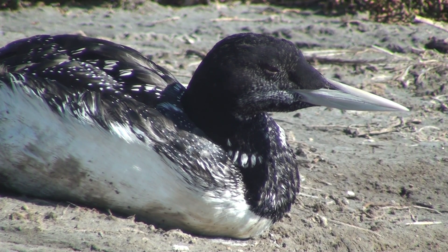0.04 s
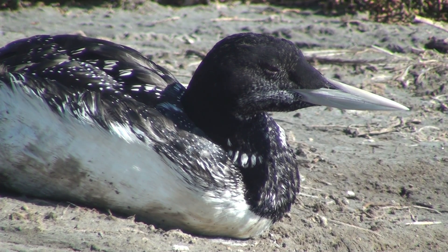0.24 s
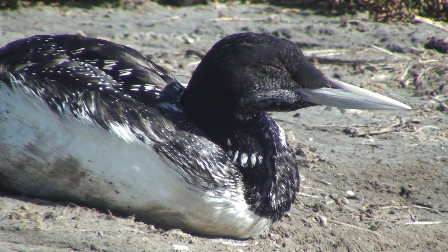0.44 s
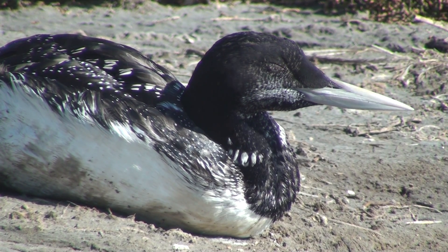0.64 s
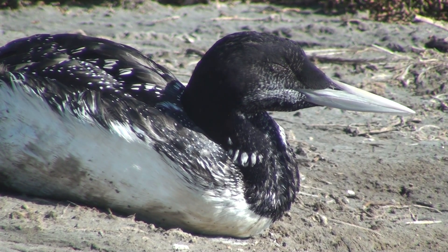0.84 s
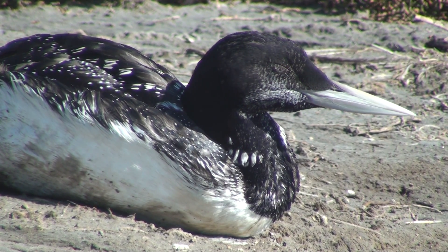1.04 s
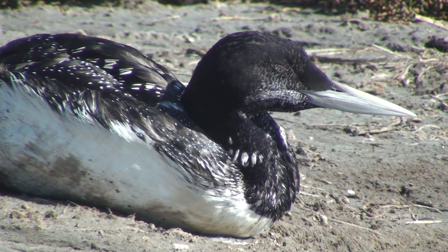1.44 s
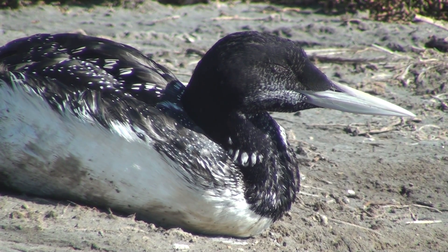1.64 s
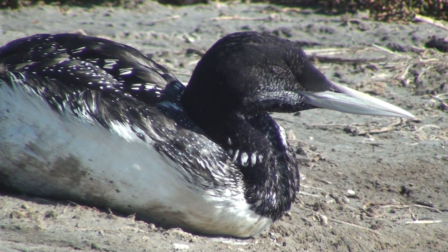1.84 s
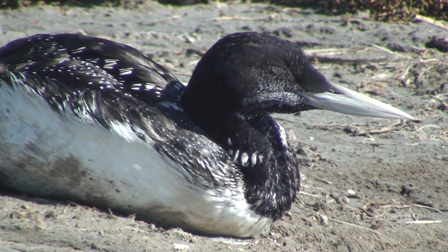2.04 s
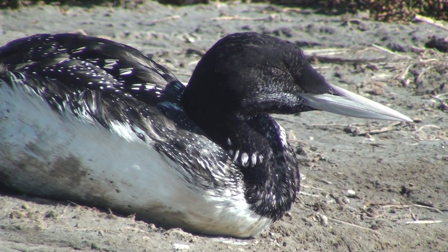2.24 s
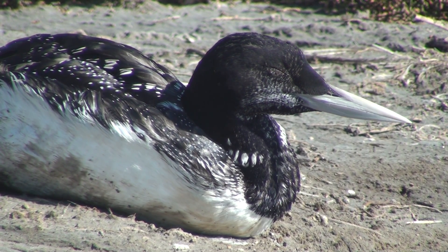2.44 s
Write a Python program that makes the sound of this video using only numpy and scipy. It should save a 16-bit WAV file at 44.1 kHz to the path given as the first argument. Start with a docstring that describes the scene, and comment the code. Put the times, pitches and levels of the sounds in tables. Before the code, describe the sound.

A brief gust of wind buffets the microphone over open ground, thumping and crackling. Weaker puffs follow over a steady outdoor rumble, while faint, uneven rustling close on the left finishes with light ticks.

```python
"""On open sand, beside a resting bird, wind blows across a camera's two microphone openings.
A flurry of eddies (small swirls of air) hits them with thumps, pops and sputter,
then weaker eddies stir the low outdoor rumble. A soft rustle comes and goes close on the left
and ends in tiny ticks. Far off are a faint hum and one short peep."""
import sys
import numpy as np
from scipy import signal
from scipy.fft import rfft, irfft
from scipy.io import wavfile

SR = 44100
rng = np.random.default_rng(int(sys.argv[2]) if len(sys.argv) > 2 else 0)


def dump_mix(stems):
    """Bounce the given channels to the path in sys.argv[1] as a 16-bit WAV at rate SR."""
    frames = np.atleast_2d(stems).T  # one column per channel
    limited = np.clip(frames, -1, 1)  # hard clip at full scale
    pcm = np.round(limited * 32767).astype(np.int16)
    wavfile.write(sys.argv[1], SR, pcm)


N = 114660
TIME, FREQS = np.arange(N) / SR, np.fft.rfftfreq(N, 1 / SR)

# How alike the wind is on both sides. Each row: frequency in Hz, likeness (1 same, 0 unrelated).
WIND_LIKENESS = [(40, 0.9), (80, 0.72), (150, 0.4), (380, -0.14), (2400, -0.52)]
# The swirls of air. Each row: peak time, rise and fall in seconds, level in dB,
# frequency in Hz above which it dulls, how much louder the left is in dB.
EDDIES = [(.045, 0.072, .04, -41, 71, -0.5), (0.231, 0.012, .008, -33, 67, 9.5),
          (.29, 0.033, .03, -44.5, 118, 5), (.343, 0.015, 0.016, -26.5, 139, 2.5),
          (0.367, 0.0086, 0.017, -33, 133, 0), (.43, 0.062, 0.043, -35, 195, -2.5),
          (.48, 0.0061, 0.019, -25, 161, -3.5), (.515, 0.013, 0.076, -39, 209, -1.5),
          (0.593, 0.012, 0.018, -31, 204, -2.5), (.613, 0.0064, 0.0093, -27.5, 160, -3),
          (0.654, 0.075, 0.021, -36, 126, -2.5), (0.736, 0.0084, 0.013, -34.5, 113, 6),
          (.752, 0.0048, 0.0038, -37.5, 130, -2), (0.881, 0.013, 0.029, -43, 98, 0),
          (1.309, 0.023, 0.0083, -39.5, 70.5, 0), (1.372, 0.015, 0.04, -53, 108, -22),
          (1.561, 0.03, 0.023, -38.5, 107, -3.5), (1.623, 0.02, 0.0096, -37.5, 53.3, 6.5),
          (1.66, 0.015, 0.016, -42, 142, -4), (2.25, 0.05, 0.058, -43.5, 87, -3)]
def eddy(peak, rise, fall, level_db, dull_hz, left_db):
    """One swirl passes the openings, and its churning pressure makes a swell of deep noise."""
    bass_cut_hz, treble_cut_hz, churn_db = 37, 1920, 1.5
    tone = FREQS ** 2 / (FREQS ** 2 + bass_cut_hz ** 2)
    tone /= np.hypot(1, (FREQS / dull_hz) ** 2.3)
    tone /= np.hypot(1, (FREQS / treble_cut_hz) ** 2)
    lag = TIME - peak
    swell = np.exp(-(lag / np.where(lag < 0, rise, fall)) ** 2 / 2)
    swirl = noise_pair(tone, WIND_LIKENESS) * swell * gain(churn_db * wobble(rate_hz=98))
    sides = gain(level_db + np.array([[left_db], [-left_db]]) / 2)
    return unit_level(swirl) * np.sqrt(np.mean(swell ** 2)) * sides


# Sudden jolts of air. Each row: time in seconds, left and right peak pressure
# (1 is full scale, minus is a pull), width in seconds.
POPS = [(0.3255, 0.051, -0.15, 0.00049), (0.3392, -0.075, .08, .0007), (.368, 0.014, 0.039, 0.0032),
        (0.4674, 0.3, 0.29, 0.00086), (0.476, 0.22, -.15, .0006), (0.4874, 0.045, 0.11, 0.0015),
        (.524, -0.027, 0.083, .0006), (0.5449, -0.0031, -.05, 0.00028), (0.5881, 0.054, -0.093, 0.00076),
        (0.5968, 0.009, 0.098, 0.00031), (.604, 0.00018, 0.1, 0.00037), (0.608, 0.085, .13, 0.0005),
        (0.611, -0.12, 0.025, 0.00074), (0.6211, -0.012, -0.08, 0.00032), (0.7312, 0.008, -0.055, 0.00057),
        (0.7576, -0.048, -0.068, 0.0013)]
def pop(when, left, right, width):
    """A rounded pressure spike hits the openings; the microphone's bass cut makes it swing back."""
    rounding_s, bass_cut_hz, treble_cut_hz = 0.00024, 55, 1480
    lag = TIME - when
    leaning_width = width * (1 - 0.19 * np.tanh(lag / rounding_s))  # falls faster than it rises
    spike = np.exp(-np.hypot(lag, rounding_s) / leaning_width) + 1e-20
    spike = signal.lfilter(*signal.butter(1, bass_cut_hz, "high", fs=SR), spike)
    spike = signal.lfilter(*signal.butter(2, treble_cut_hz, fs=SR), spike)
    return np.array([[left], [right]]) * spike / spike.max()


# The sputter's tone. Each row: frequency in Hz, relative strength in dB.
SPUTTER_TONE = [(100, -23.5), (400, 6), (1000, -2), (2000, -12.5), (3000, -28), (5000, -44), (16000, -65)]
# Its bursts. Each row: time in seconds, level on the right in dB.
SPUTTER_LEVEL = [(.31, -80), (.35, -47), (.38, -51.5), (.41, -44.5), (.46, -50.5), (.51, -47.5),
                 (.555, -75), (.6, -59), (.623, -43), (.64, -60), (.78, -82)]
def sputter(clicks_per_s=1000, spread_db=6, left_db=-16):
    """Tiny swirls break off the rims of the openings as soft clicks, mostly on the right."""
    clicks = (rng.random((2, N)) < clicks_per_s / SR) * rng.choice([-1, 1], (2, N))
    clicks = clicks * gain(spread_db * rng.standard_normal((2, N)))
    crackle = unit_level(irfft(rfft(clicks) * gain(over_hz(SPUTTER_TONE)), N))
    blowing = (TIME > SPUTTER_LEVEL[0][0]) & (TIME < SPUTTER_LEVEL[-1][0])
    return blowing * crackle * gain(over_time(SPUTTER_LEVEL)) * gain([[left_db], [0]])


# The breeze's deep tone. Each row: frequency in Hz, relative strength in dB.
RUMBLE_TONE = [(10, -6), (25, 3.5), (50, 3), (90, -1), (160, -14), (400, -35), (2000, -74)]
# Its swells. Each row: time in seconds, level on the right in dB.
RUMBLE_LEVEL = [(0, -49.5), (.17, -51), (.4, -35), (.7, -39), (.87, -54), (1.1, -56), (1.35, -49.5),
                (1.65, -47.5), (1.9, -64), (2.15, -56), (2.27, -49), (2.42, -54), (2.6, -57)]
def rumble(left_db=-0.5):
    """Slow pressure changes in the breeze make a low rumble between the eddies."""
    return shaped_noise(RUMBLE_TONE, WIND_LIKENESS, RUMBLE_LEVEL) * gain([[left_db], [0]])


# The rustle's tone. Each row: frequency in Hz, relative strength on the left and right in dB.
RUSTLE_TONE = [(151, -2, -4), (427, 10.5, 5), (880, 6.5, 5), (1490, 5, -7), (3130, 3.5, -6.5),
               (4240, -0.5, -19), (7300, 1, -11.5), (9700, -15.5, -18), (11500, -17, -20),
               (16000, -27, -28)]
# Its strokes. Each row: time in seconds, level in dB before the boost.
RUSTLE_STROKES = [(1.03, -92), (1.094, -69.5), (1.118, -73), (1.142, -62.5), (1.17, -66), (1.182, -76),
                  (1.326, -60.5), (1.358, -67.5), (1.494, -62), (1.566, -63.5), (1.61, -73), (1.686, -61.5),
                  (1.726, -65), (1.878, -59), (1.906, -67), (1.926, -61), (1.99, -68), (2.022, -59.5),
                  (2.078, -58.5), (2.11, -66), (2.186, -61.5), (2.218, -66), (2.23, -59.5), (2.438, -67),
                  (2.442, -60.5), (2.468, -77)]
# The tone of its silky top. Each row: frequency in Hz, relative strength in dB.
SILK_TONE = [(2000, -30), (5000, -11), (7000, -2.5), (8500, 2), (10000, 0.5), (11500, -6.5), (16000, -19)]
# The swells of that top. Each row: time in seconds, level on the right in dB.
SILK_LEVEL = [(.15, -86), (.3, -72), (.38, -82), (1.09, -86), (1.15, -67.5), (1.2, -84), (1.3, -67),
              (1.36, -69), (1.47, -64.5), (1.56, -68.5), (1.63, -76), (1.685, -63), (1.73, -71), (1.8, -63),
              (1.865, -61.5), (1.91, -70.5), (1.98, -69), (2.04, -60.5), (2.085, -61), (2.125, -73.5),
              (2.18, -64), (2.21, -69), (2.28, -64), (2.42, -64), (2.46, -82), (2.6, -89)]
# How alike both sides are, for the strokes and the top. Each row: frequency in Hz, likeness.
RUSTLE_LIKENESS = [(400, 1), (700, 0.9), (1300, 0.14), (2400, 0.71), (4400, 0.78), (8100, .6),
                   (11000, 0.39), (12000, .99)]
SILK_LIKENESS = [(5000, 1), (9000, 0.66), (11000, 0.4), (12000, 0.87)]
def rustle(boost_db=5, stop_s=2.47, grain_db=0.87, silk_left_db=-1):
    """A soft, grainy hiss comes in uneven strokes on the left, with a silky top nearer the middle."""
    tone = gain([over_hz(RUSTLE_TONE, column=1), over_hz(RUSTLE_TONE, column=2)])
    rubbing = (TIME > RUSTLE_STROKES[0][0]) & (TIME < stop_s)
    hiss = rubbing * noise_pair(tone, RUSTLE_LIKENESS) * gain(boost_db + over_time(RUSTLE_STROKES))
    silk = shaped_noise(SILK_TONE, SILK_LIKENESS, SILK_LEVEL) * gain([[silk_left_db], [0]])
    return (hiss + silk) * gain(grain_db * flicker(rate_hz=82))


# The rustle's hollow tone. Each row: frequency in Hz, relative strength in dB.
BODY_TONE = [(150, -6), (300, -1), (420, 1.5), (520, 1.5), (700, -6.5), (900, -15.5), (1100, -10.5),
             (1500, -18), (4000, -28)]
# Its swells. Each row: time in seconds, level in dB.
BODY_LEVEL = [(.9, -89), (1.1, -60.5), (1.22, -73), (1.32, -55.5), (1.55, -57), (1.67, -60.5),
              (1.74, -64.5), (1.83, -51), (1.93, -62), (2.02, -56.5), (2.28, -57.5), (2.42, -67),
              (2.6, -62)]
def rustle_body(rough_db=1.0):
    """The dull, hollow part of the rustle trembles slightly as it swells and fades."""
    hollow = shaped_noise(BODY_TONE, RUSTLE_LIKENESS, BODY_LEVEL)
    return hollow * gain(rough_db * wobble(rate_hz=35))


# Rubs within the rustle. Each row: peak time and half length in seconds,
# pitch and pitch spread in Hz, level in dB.
SCUFFS = [(1.532, 0.04, 1040, 200, -58), (1.663, 0.0053, 515, 130, -48.5), (2.01, 0.0075, 690, 129, -52.5)]
def scuff(peak, half_length, hz, spread_hz, level_db):
    """A brief rub sets off a noisy ring around one pitch."""
    ring = noise_pair(1 / (1 + (2 * (FREQS - hz) / spread_hz) ** 2), RUSTLE_LIKENESS)
    return gain(level_db) * ring * np.exp(-((TIME - peak) / half_length) ** 2 / 2)


# The notes in a knock. Each row: pitch in Hz, relative level in dB, seconds to fade by 60 dB.
KNOCK_NOTES = [(983, 1.5, 0.074), (1920, -1, 0.036), (2000, -2, 0.021), (3770, -6, 0.024)]
# The closing ticks. Each row: start in seconds, knock and snap levels in dB before halving.
TICKS = [(2.275, -45, -64), (2.347, -56, -50), (2.443, -45.5, -55), (2.479, -50, -57), (2.506, -55, -47)]
def tick(start, knock_db, snap_db, snap_fade_s=0.022):
    """A tiny knock rings briefly, along with a bright snap of noise."""
    age = np.clip(TIME - start, 0, .5)
    knock = sum(gain(knock_db + db - 60 * age / fade_s) * np.sin(2 * np.pi * hz * age)
                for hz, db, fade_s in KNOCK_NOTES)
    bright_band = (FREQS > 3500) & (FREQS < 11900)
    snap = noise_pair(bright_band, SILK_LIKENESS) * gain(snap_db - 60 * age / snap_fade_s)
    return (TIME > start) * (knock + snap) / 2


def peep(start_s=.019, length_s=.032, rise_s=.012, fall_s=.002, hz=3962, level_db=-62.5):
    """One faint, short, high note comes from far away."""
    age = TIME - start_s
    swell = np.clip(np.minimum(age / rise_s, (length_s - age) / fall_s), 0, 1)
    return gain(level_db) * swell * np.sin(2 * np.pi * hz * age)


def hum(hz=848, waver_hz=1.8, level_db=-72.5):
    """A thin, distant tone holds on, its pitch wavering a little."""
    pitch = hz + waver_hz * wobble(rate_hz=4.35)
    return gain(level_db) * unit_level(np.sin(2 * np.pi * np.cumsum(pitch) / SR))


# The tone of the outdoors. Each row: frequency in Hz, relative strength in dB.
AIR_TONE = [(25, -14), (60, 1), (110, -1.5), (180, -4.5), (260, -13), (480, -18.5), (700, -23.5),
            (1000, -22.5), (1400, -28.5), (2400, -34.5), (4500, -39.5), (10000, -47), (12500, -45.5),
            (16000, -49.5)]
# How alike both sides are. Each row: frequency in Hz, likeness.
AIR_LIKENESS = [(60, 0.81), (130, 1), (330, 0.92), (640, 0.54), (1400, 0.039), (3100, 0.12), (6800, 0.48),
                (10500, 0.32), (12000, 1)]
# Its gentle drift. Each row: time in seconds, level in dB.
AIR_LEVEL = [(0, -45.5), (.8, -47), (1.1, -46.5), (1.5, -48.5), (2.0, -47), (2.6, -45.5)]
def outdoor_air():
    """A nearly steady rumble with a thin hiss lies behind everything."""
    return shaped_noise(AIR_TONE, AIR_LIKENESS, AIR_LEVEL)


def gain(db):
    """Turns decibels into a number to multiply by."""
    return 10 ** (np.asarray(db) / 20)


def unit_level(x):
    """Scales a signal so its average (root mean square) size is 1."""
    return x / np.sqrt(np.mean(x ** 2) + 1e-20)


def over_hz(points, column=1):
    """Joins a table's points into a curve over frequency, with octaves evenly spaced."""
    columns = np.transpose(points)
    return np.interp(np.log(FREQS + 1), np.log(columns[0] + 1), columns[column])


def over_time(points):
    """Joins a table's points into a curve over time."""
    return np.interp(TIME, *np.transpose(points))


def noise_pair(tone, likeness):
    """Left and right noise with a given tone, as alike as the table says."""
    left, unrelated = rfft(rng.standard_normal((2, N)))
    shared = np.clip(over_hz(likeness), -1, 1)
    right = shared * left + np.sqrt(1 - shared ** 2) * unrelated
    return unit_level(irfft(np.array([left, right]) * tone, N))


def shaped_noise(tone, likeness, level):
    """Left and right noise that follows tables of tone, likeness and level."""
    return noise_pair(gain(over_hz(tone)), likeness) * gain(over_time(level))


def wobble(rate_hz):
    """Random wandering, mostly slower than the given rate."""
    return unit_level(irfft(rfft(rng.standard_normal(N)) / (1 + (FREQS / rate_hz) ** 2), N))


def flicker(rate_hz):
    """Quick random flutter around the given rate, with no slow drift."""
    return unit_level(irfft(rfft(rng.standard_normal(N)) * FREQS / (1 + (FREQS / rate_hz) ** 3), N))


def scene():
    """Adds the wind, the rustle and the background together."""
    wind = sum(eddy(*row) for row in EDDIES) + sum(pop(*row) for row in POPS) + sputter() + rumble()
    rubbing = rustle() + rustle_body() + sum(scuff(*row) for row in SCUFFS)
    ticks = sum(tick(*row) for row in TICKS)
    return wind + rubbing + ticks + outdoor_air() + hum() + peep()


def record(dry):
    """The camera cuts off the very highest treble."""
    top_hz = 16500
    treble_cut = signal.firwin(511, top_hz, window=("kaiser", 9), fs=SR)
    return signal.oaconvolve(dry, treble_cut[None], "same")


dry = scene()
out = record(dry)
dump_mix(out)
```